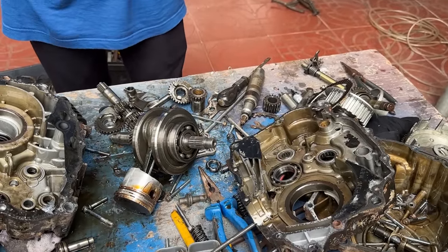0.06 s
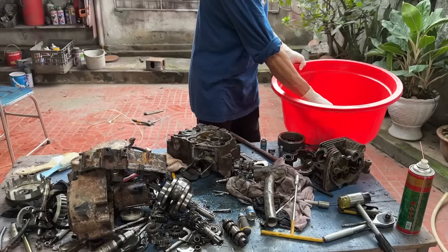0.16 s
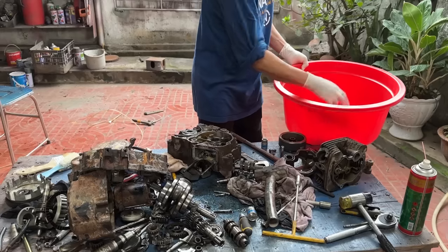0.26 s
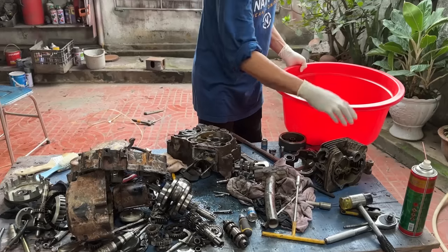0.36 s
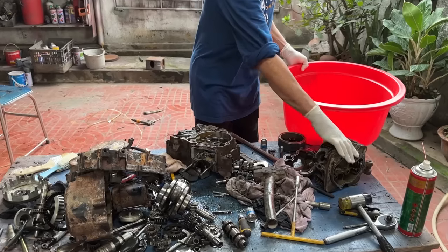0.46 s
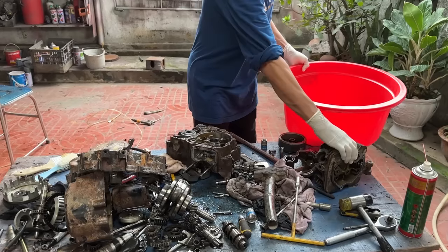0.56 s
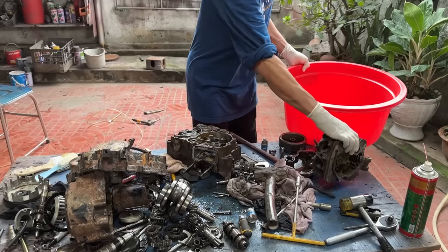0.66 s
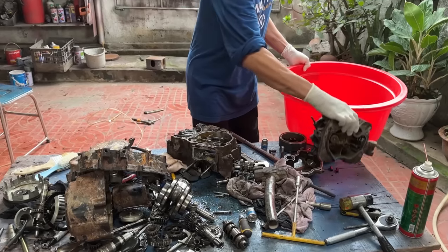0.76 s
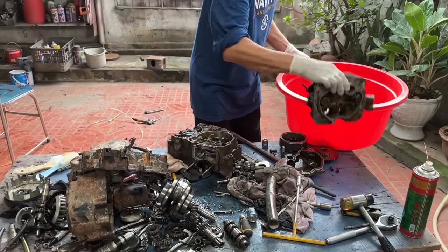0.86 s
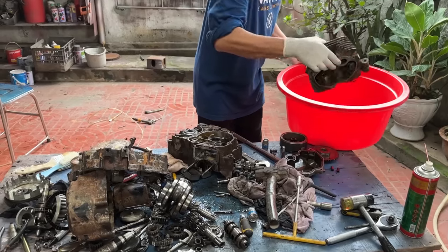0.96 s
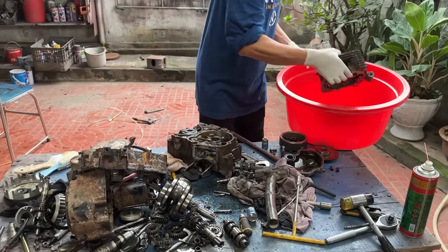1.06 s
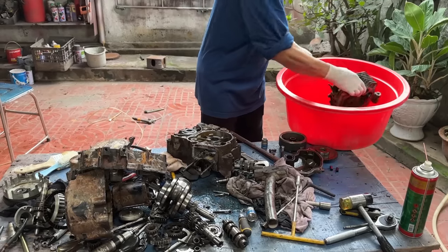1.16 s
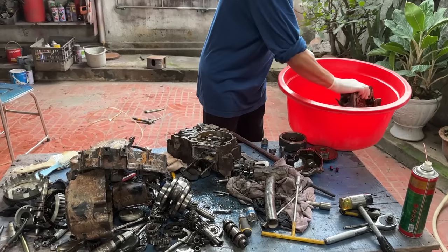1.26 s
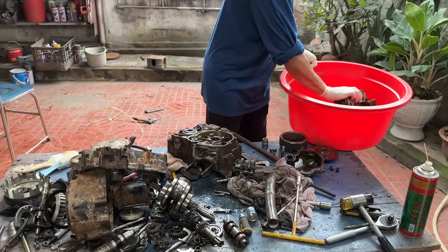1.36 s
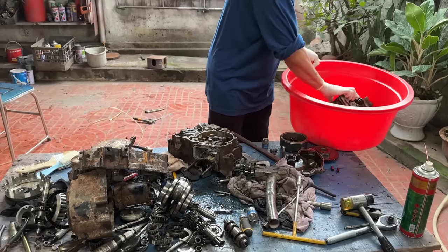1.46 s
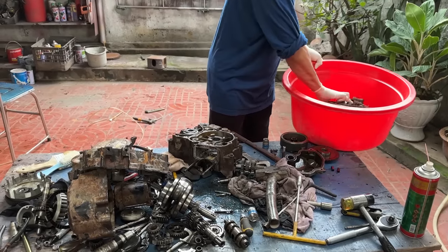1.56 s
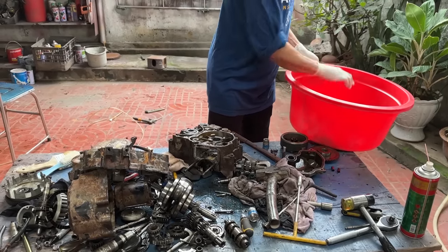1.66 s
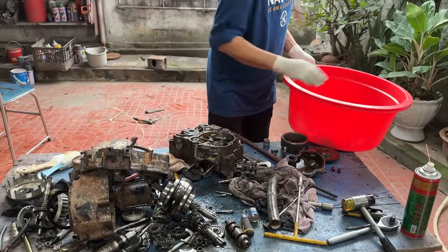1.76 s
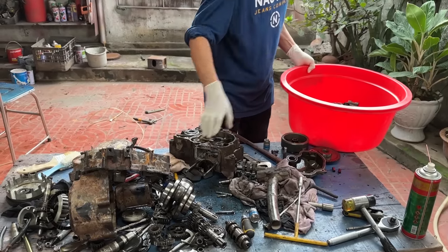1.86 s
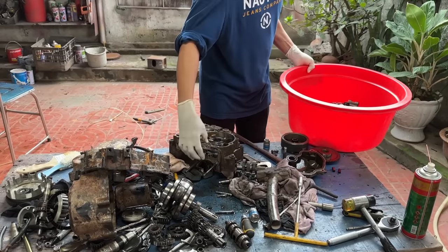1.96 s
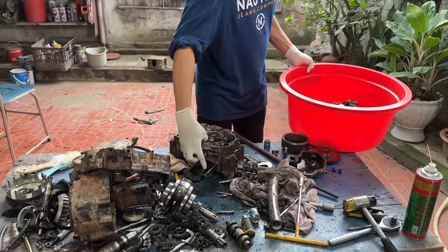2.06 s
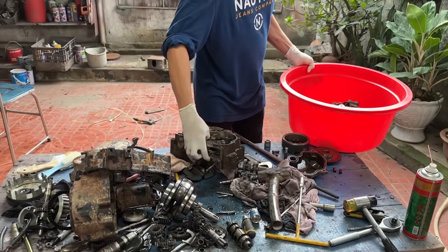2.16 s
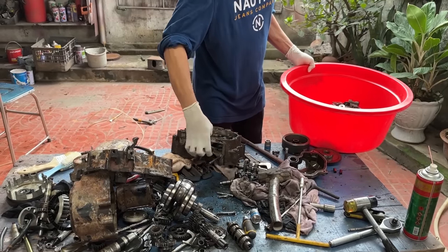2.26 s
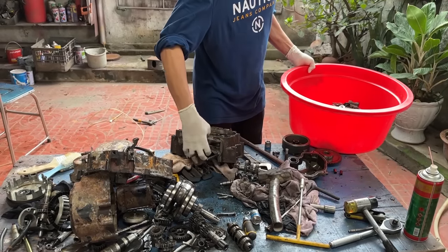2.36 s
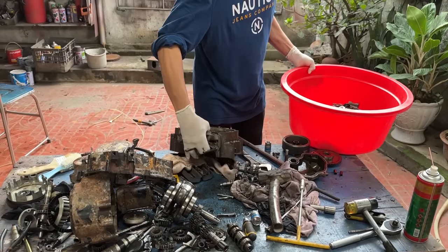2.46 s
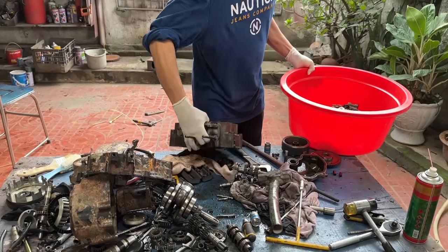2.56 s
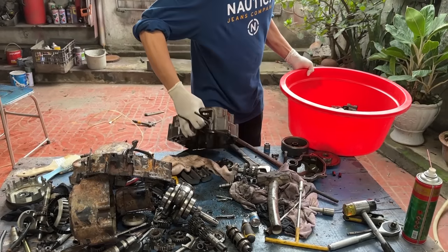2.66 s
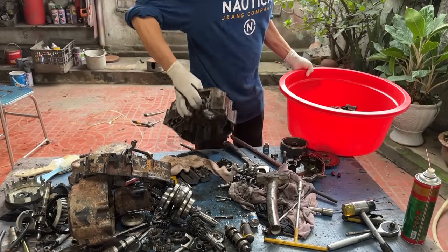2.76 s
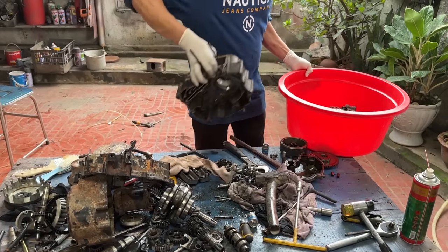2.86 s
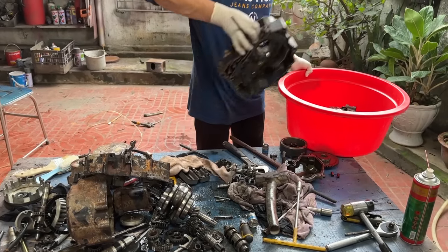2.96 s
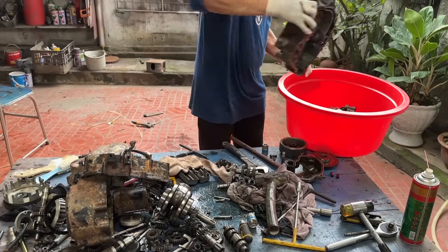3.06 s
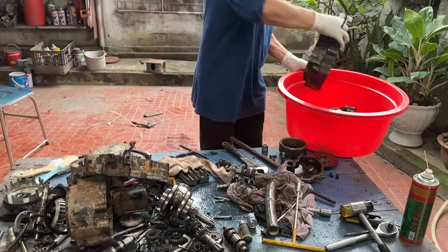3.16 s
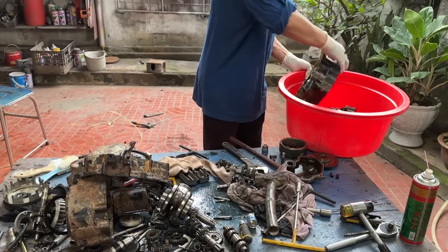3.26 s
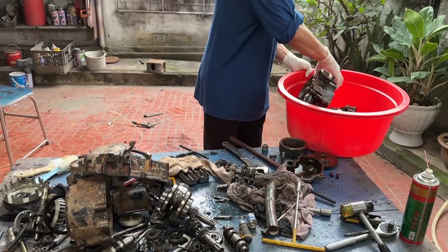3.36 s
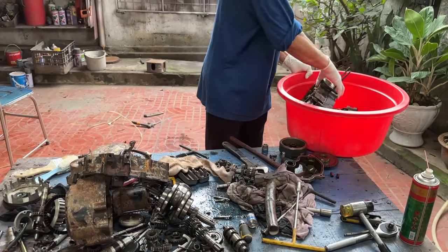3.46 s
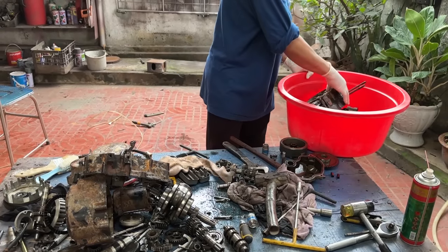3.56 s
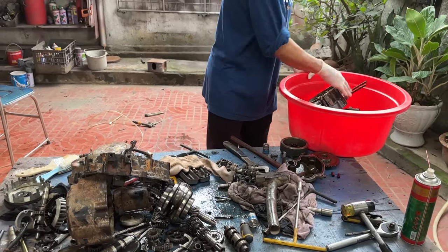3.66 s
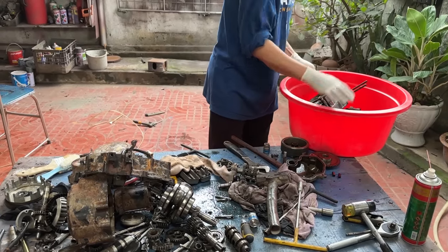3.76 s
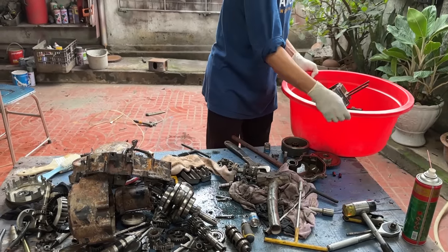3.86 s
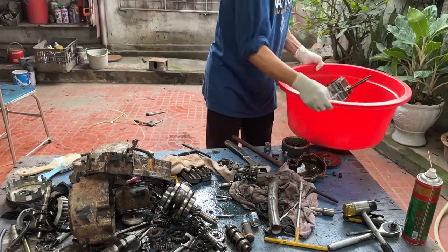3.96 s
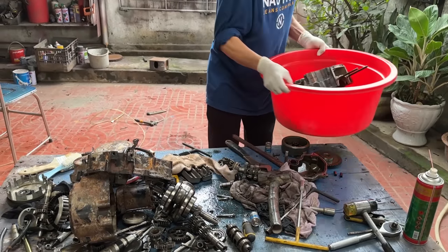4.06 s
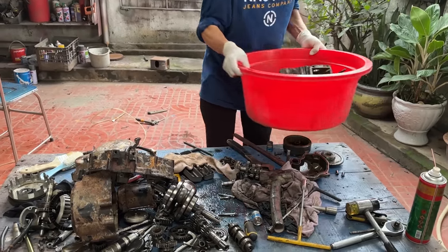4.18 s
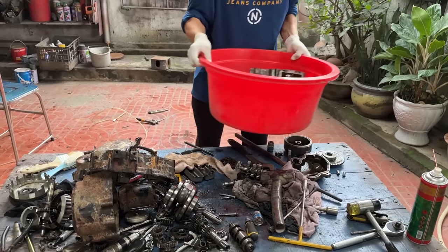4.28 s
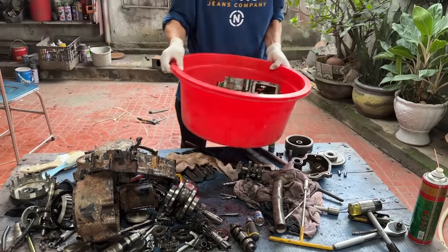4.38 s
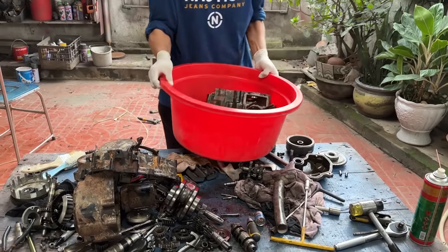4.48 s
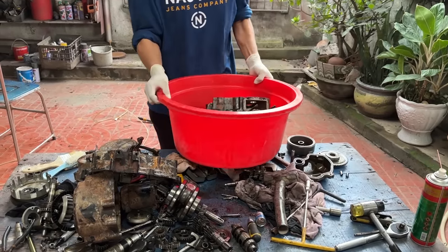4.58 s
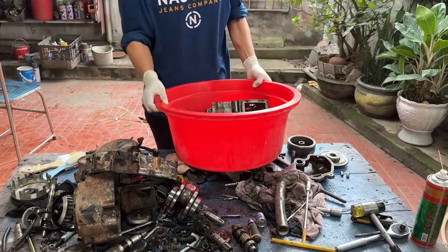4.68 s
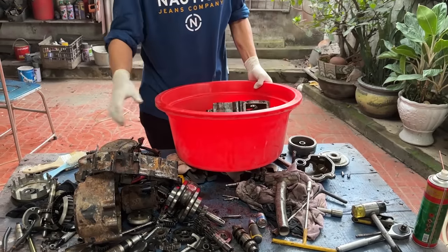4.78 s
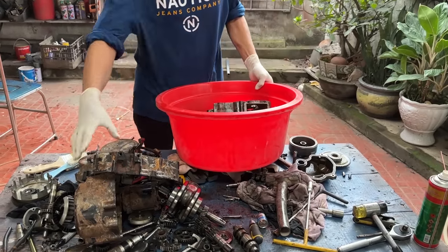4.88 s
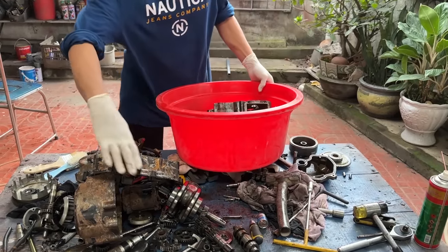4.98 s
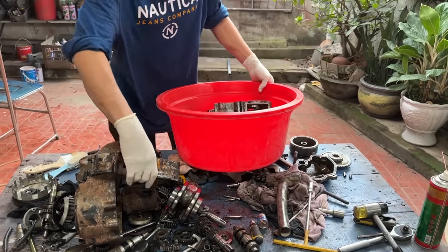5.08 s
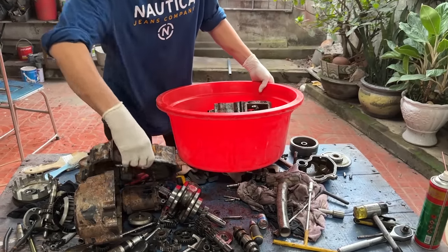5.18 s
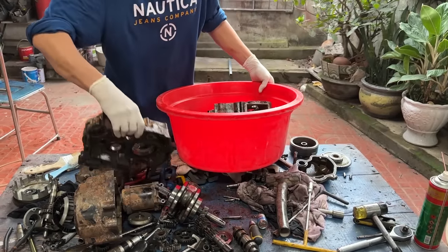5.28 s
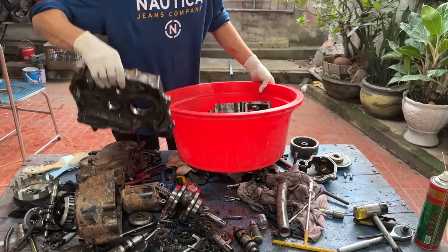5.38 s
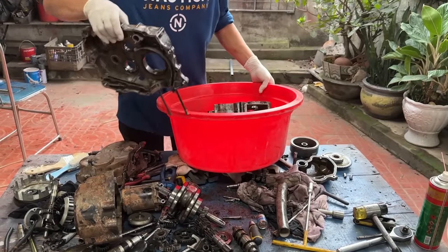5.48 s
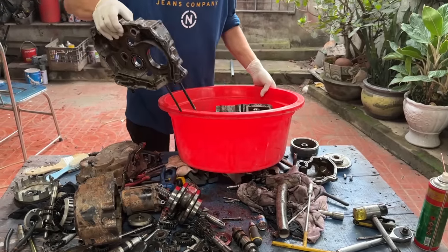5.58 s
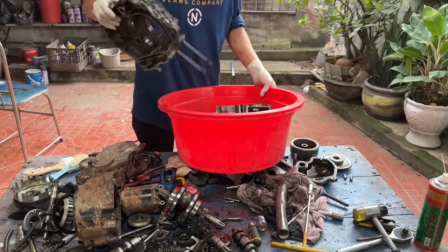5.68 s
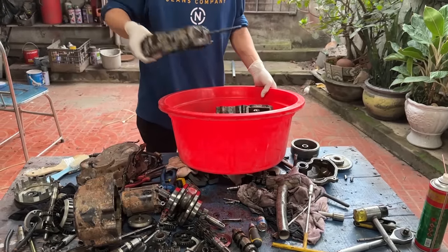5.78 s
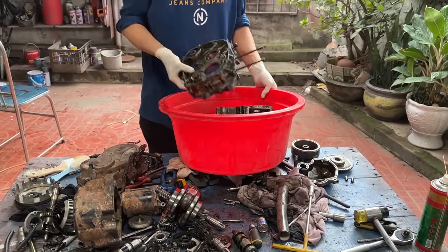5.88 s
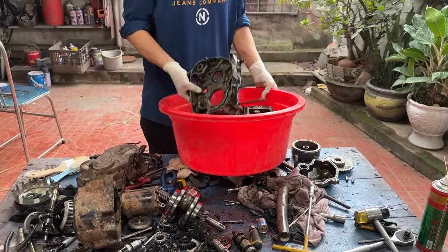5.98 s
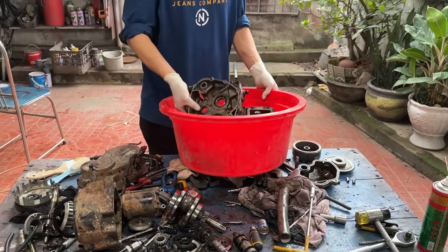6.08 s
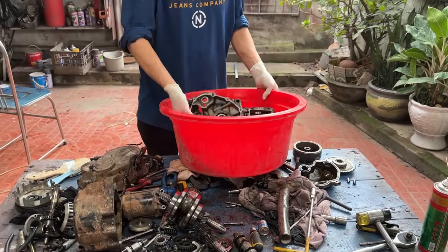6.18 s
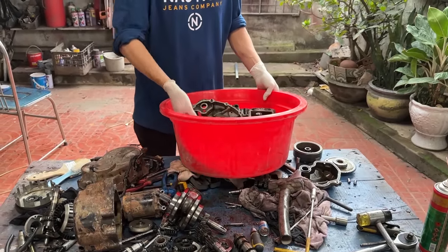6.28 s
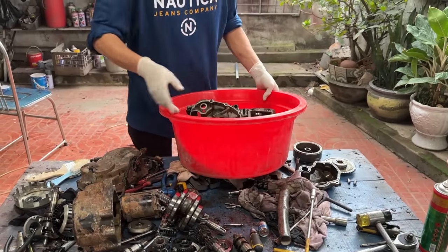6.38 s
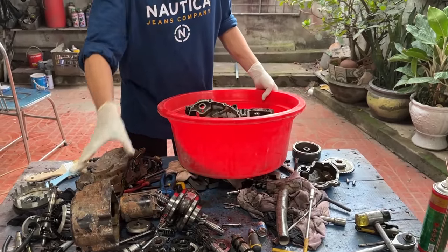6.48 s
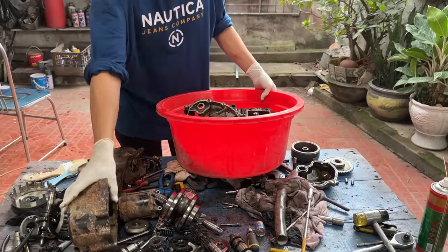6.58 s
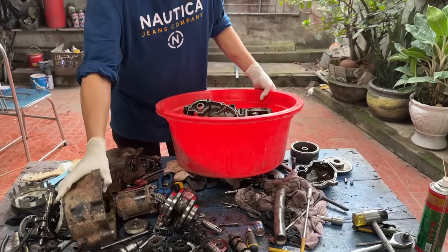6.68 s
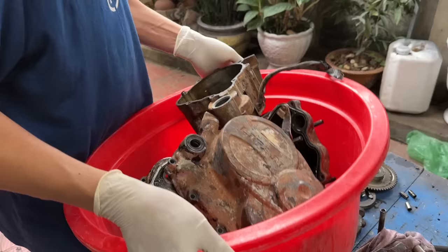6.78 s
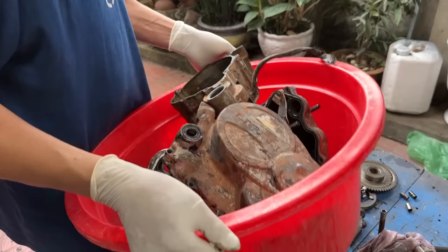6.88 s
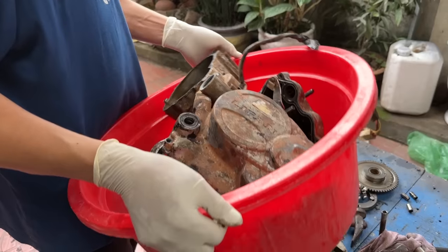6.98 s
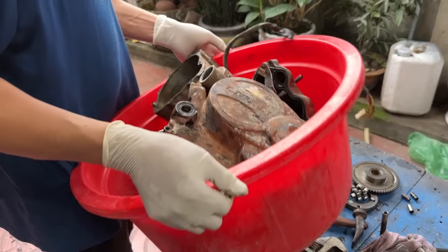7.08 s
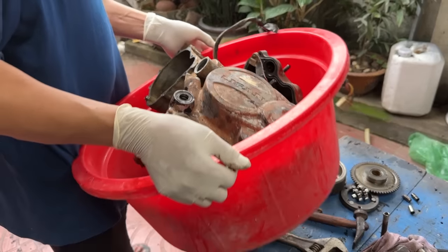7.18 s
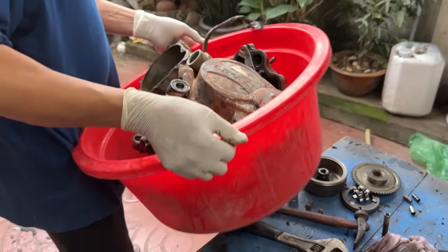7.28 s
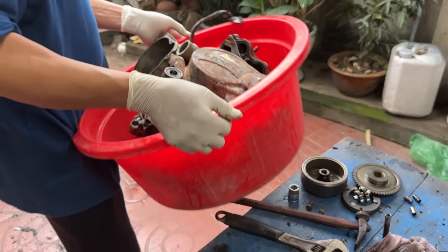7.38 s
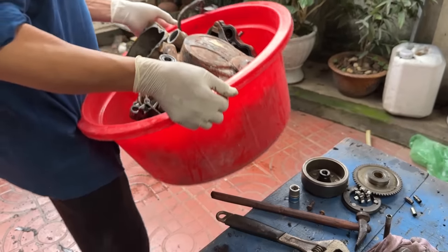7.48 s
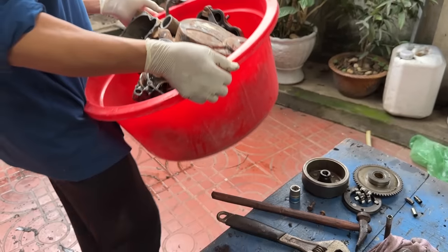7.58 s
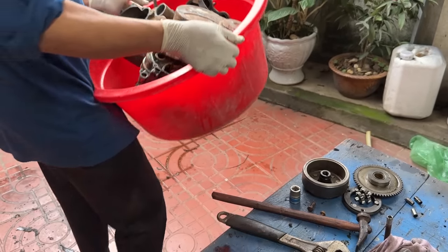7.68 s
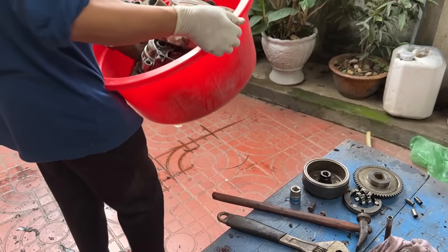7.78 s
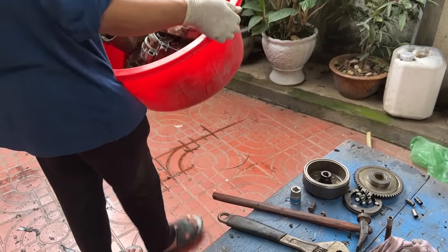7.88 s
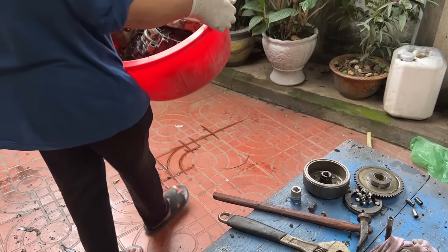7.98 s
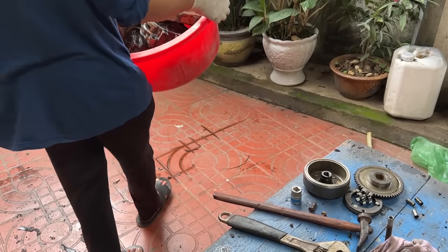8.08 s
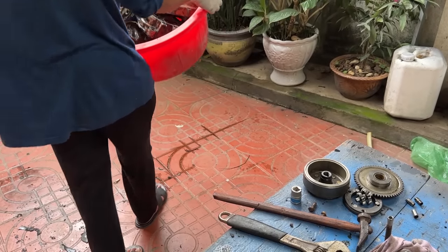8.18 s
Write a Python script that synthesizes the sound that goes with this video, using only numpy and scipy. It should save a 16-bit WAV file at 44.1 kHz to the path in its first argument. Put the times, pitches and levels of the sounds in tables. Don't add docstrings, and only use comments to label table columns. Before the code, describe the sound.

Cast metal engine parts knock, clank and scrape as they are lifted off a cluttered bench and dropped into a plastic tub in a walled yard.

```python
import sys
import numpy as np
from scipy import signal
from scipy.fft import rfft, irfft, next_fast_len
from scipy.io import wavfile
from scipy.ndimage import uniform_filter1d

SR = 44100
rng = np.random.default_rng(int(sys.argv[2]) if len(sys.argv) > 2 else 0)


def wav_record(signal):
    frames = np.transpose(np.atleast_2d(signal))
    bounded = np.clip(frames, -1, 1)
    quanta = np.round(bounded * 32767).astype(np.int16)
    wavfile.write(sys.argv[1], SR, quanta)


def magnitude_from_level(level_db):
    exponent = np.asarray(level_db, float) / 20
    return 10 ** exponent


N = 363366


def evened(x):
    return x / np.sqrt(np.mean(x ** 2) + 1e-20)


def peaked(x):
    return x / (abs(x).max() + 1e-12)


def read(points, hz):
    point_hz, value = np.transpose(points)
    return np.interp(np.log(hz + 1), np.log(point_hz + 1), value)


def add(mix, start_s, sound, pan_db):
    part = mix[:, round(start_s * SR):][:, :sound.shape[-1]]
    part += magnitude_from_level(np.array([[pan_db], [-pan_db]]) / 2) * sound[..., :part.shape[1]]


def coloured(x, points):
    size = next_fast_len(x.shape[-1])
    gain = magnitude_from_level(read(points, np.fft.rfftfreq(size, 1 / SR)))
    return irfft(rfft(x, size) * gain, size)[..., :x.shape[-1]]


def softened(x, rise_s):
    rise = np.minimum(np.arange(x.shape[-1]) / (rise_s * SR), 1)
    return x * np.sin(np.pi / 2 * rise) ** 2


def clatter(t60_s, share, size):
    t = np.arange(size) / SR
    strength = magnitude_from_level(2.47 * np.minimum(rng.exponential(1, size), 3)) * rng.standard_normal(size)
    hits = strength * (rng.random(size) < 3000 / SR)
    hits = share * hits * magnitude_from_level(-60 * t / np.clip(t60_s, .01, .4))
    hits[0] = 1
    return hits[None]


def last_before(rows, start_s):
    return max((row for row in rows if row[0] < start_s), key=lambda row: row[0])


# [pitch_hz, side_over_mid_db]
WIDTH = [(60, -27.5), (180, -23.5), (550, -15.5), (1650, -6), (4970, 0.4), (15000, -1)]


def ring(hz, level_db, t60_s, size):
    pole = 2j * np.pi * hz - np.log(1000) / np.maximum(t60_s, .004)
    modes = np.cumprod(np.repeat(np.exp(pole / SR)[:, None], size, 1), 1)
    lean = 1j * magnitude_from_level(read(WIDTH, hz)) * rng.choice([-1., 1.], len(hz))
    return (magnitude_from_level(level_db) * np.array([1 + lean, 1 - lean]) @ modes).imag


def echo(x, decays, size):
    taps = np.zeros((2, SR))
    at = np.arange(300, SR - 20, 20) + rng.integers(0, 20, (2, (SR - 301) // 20))
    np.put_along_axis(taps, at, rng.choice([-1., 1.], at.shape), 1)
    taps = np.array([taps[0] + 0.51 * taps[1], taps[0] - 0.47 * taps[1]])
    hz, t, z = signal.stft(taps, SR, nperseg=256)
    fade = magnitude_from_level(-60 * t / read(decays, hz)[:, None])
    tail = signal.istft(z * fade, SR, nperseg=256)[1]
    tail = tail[:, :size] / np.linalg.norm(tail[0])
    return signal.oaconvolve(x, tail, axes=1)[:, :x.shape[1]]


# [pitch_hz, likeness]
SAME = [(60, 0.97), (180, 0.97), (550, 0.53), (1650, 0.05), (4970, 0.16), (15000, 0.03)]


def air(points, patchy_db, size):
    frames, hz = size // 256 + 5, np.fft.rfftfreq(1024, 1 / SR)
    a, b, c, d, patches = rng.standard_normal((frames, 513, 5)).T
    patches = uniform_filter1d(patches, size=14, axis=0)
    patches = evened(uniform_filter1d(patches, size=12, axis=1))
    same = np.clip(read(SAME, hz), -1, 1)[:, None]
    left, other = a + 1j * b, c + 1j * d
    z = np.array([left, same * left + np.sqrt(1 - same ** 2) * other])
    z *= magnitude_from_level(read(points, hz)[:, None] + patchy_db * patches)
    return evened(signal.istft(z, nperseg=1024, noverlap=768)[1][:, :size])


def hum(hz, width_hz, level_db):
    r = np.exp(-np.pi * width_hz / SR)
    noise = rng.standard_normal(N) + 1j * rng.standard_normal(N)
    slow = signal.lfilter([1], np.convolve([1, -r], [1, -r]), noise)
    carrier = np.exp(2j * np.pi * hz * np.arange(N) / SR)
    return magnitude_from_level(level_db) * evened((slow * carrier).real)


# [end_s, start_s]
GAPS = [
    (.133, 0.1584),
    (6.817, 6.83),
]
# [pitch_hz, level_db_per_hz]
STREET = [(15, -61), (30, -35), (76, -1), (131, -17.5), (202, -13.5), (245, -23.5), (321, -20), (878, -28),
          (1430, -33), (4130, -41), (6920, -43), (10700, -61.5), (16500, -72)]
# [start_s, engine_db, street_air_db]
TRAFFIC = [
    (6.83, -45, -50.5),
    (7.002, -40.5, -51.5),
    (7.6, -46, -57.5),
    (8.04, -56, -65),
    (8.068, -51, -60.5),
    (8.24, -49, -56),
]
# [pitch_hz, level_db_per_hz]
YARD = [(15, -73), (30, -53), (138, -7), (177, -13.5), (726, -28), (927, -30), (1060, -30), (1880, -37),
        (4130, -36), (7300, -44.5), (8600, -40.5), (14400, -45.5), (16500, -64)]
# [pitch_hz, width_hz, level_db]
HUMS = [
    (135.6, 15, -63),
    (79.5, 10, -65.5),
]
YARD_DB, OPENING_DB = -57, -44.5


def background():
    t = np.arange(N) / SR
    middle = (t > GAPS[0][0]) & (t < GAPS[1][1])
    start_s, engine_db, street_db = np.transpose(TRAFFIC)
    yard = magnitude_from_level(YARD_DB) * air(YARD, 1.5, size=N) + sum(hum(*row) for row in HUMS)
    street = magnitude_from_level(np.interp(t, start_s, engine_db, left=-60)) * hum(84, 13.7, 0) * np.ones((2, 1))
    street_gain = magnitude_from_level(np.interp(t, start_s, street_db + 12, left=OPENING_DB))
    street[:, ~middle] += street_gain[~middle] * air(STREET, 2.26, size=N - middle.sum())
    return np.where(middle, yard, street)


# [start_s, clank_db, tick_over_clank_db, pitch_hz]
IN_TUB = [(0.002, -26.5, -28, 675), (0.057, -24, -39, 790), (0.169, -28, -21, 850),
          (0.213, -27.5, -19, 649), (0.233, -16.5, -23.5, 600), (1.285, -32, -23, 1440),
          (1.325, -24.5, -19, 600), (1.569, -18.5, -20, 885), (1.847, -28, -15, 1000),
          (3.359, -38, -9.5, 1130), (3.429, -31, -11, 2080), (3.472, -20.5, -18.5, 600),
          (3.585, -22.5, -10, 1910), (3.96, -34, -20, 940), (4.005, -30.5, -27, 600),
          (4.021, -17, -33, 937), (4.072, -34, -30, 1500), (4.117, -18.5, -14.5, 1200),
          (6.225, -16, -19.5, 604), (6.263, -13.5, -4.5, 1480), (6.309, -14.5, -15, 940),
          (6.396, -31.5, -7, 1480), (6.42, -25.5, -11.5, 603), (7.027, -12.5, -31, 1000)]
# [start_s, clank_db, tick_over_clank_db, pitch_hz]
ON_BENCH = [(0.73, -44, -14, 1290), (2.178, -29, -36, 1000), (2.2, -14, -29, 1110),
            (2.214, -19.5, -3.5, 830), (2.271, -14.5, -3, 1550), (2.3685, -21, -9, 1500),
            (2.768, -22.5, -33, 600), (2.774, -12.5, -23, 2300), (2.799, -17.5, -28, 695),
            (4.528, -22.5, -26, 675), (4.538, -30.5, -5, 1800), (4.655, -33.5, -10.5, 2500),
            (4.699, -28, -1.5, 1200), (4.675, -12, -14, 1185), (4.909, -36, -8, 2380),
            (4.954, -39, -14, 740), (5.175, -24.5, -7.5, 740), (5.301, -19.5, -6, 2430),
            (5.482, -15, -4, 904), (5.488, -7, -7, 696), (5.529, -10, -10.5, 2030),
            (5.62, -19.5, -32, 1700), (5.669, -15, -31, 988), (5.68, -10.5, -23.5, 930),
            (6.594, -32, -28, 1010), (6.658, -32.5, -14.5, 1480), (6.76, -34.5, -12.5, 904)]
# [start_s, clank_db]
REBOUNDS = [(0.282, -29.5), (1.369, -29.5), (1.577, -18), (1.61, -20), (1.627, -26), (1.659, -30.5),
            (1.718, -33.5), (2.299, -27.5), (3.457, -36.5), (4.147, -17.5), (4.586, -28), (5.202, -24),
            (5.509, -16.5), (5.548, -20.5), (5.698, -20.5), (5.718, -25), (6.289, -17.5), (6.337, -19),
            (6.623, -41), (7.047, -13.5), (7.069, -22), (7.099, -25.5)]
REBOUND_TICK_DB, REBOUND_PITCH = -3, 1.054
TUB_TILT_DB, BENCH_TILT_DB = -0.4, 1.13
TILT_PER_TICK = .06


def blows():
    first = []
    for rows, tilt_db in ((IN_TUB, TUB_TILT_DB), (ON_BENCH, BENCH_TILT_DB)):
        for row in map(tuple, rows):
            first.append(row + (tilt_db + TILT_PER_TICK * row[2],))
    again = []
    for start_s, clank_db in REBOUNDS:
        _, _, tick_db, hz, tilt_db = last_before(first, start_s)
        softer_tilt_db = tilt_db + TILT_PER_TICK * REBOUND_TICK_DB
        again.append((start_s, clank_db, tick_db + REBOUND_TICK_DB, hz * REBOUND_PITCH, softer_tilt_db))
    return sorted(first + again)


# [pitch_hz, level_db]
CASTING = [(350, -42), (600, -11.5), (729, -4), (1310, -3.5), (1510, -3.5), (1770, -5), (3270, -14),
           (5000, -21), (6500, -43.5), (11000, -120)]
# [pitch_hz, level_db]
TICK = [(1470, -34), (2500, 2), (5870, -5), (9050, -10.5), (13100, -19.5), (14700, -17), (16500, -25)]
CLATTER_S = 0.093
KNOCK_CLATTER, TICK_CLATTER = .18, .2


def knocks():
    out, t = np.zeros((2, N)), np.arange(600) / SR
    rows = blows()
    for (start_s, clank_db, tick_db, spot_hz, tilt_db), u in zip(rows, rng.random((len(rows), 169))):
        knock = clatter(CLATTER_S, KNOCK_CLATTER, size=6000)
        grit = clatter(CLATTER_S, TICK_CLATTER, size=6000)

        hz = np.geomspace(560, 5600, 56) * (.97 + .06 * u[:56])
        near_db = 6 * np.exp(-(np.log2(hz / spot_hz) / 0.38) ** 2)
        mode_db = read(CASTING, hz) + near_db + tilt_db * np.log2(hz / 1200) + 6 * u[56:112]
        t60_s = .017 * (.5 + u[112:168]) * (hz / 1500) ** -.3
        clank = softened(ring(hz, mode_db, t60_s, size=1600), .0026)

        tick = rng.standard_normal((2, 600))
        tick = coloured(tick + .5 * tick[::-1], TICK) * magnitude_from_level(-60 * t / 0.016)
        tick = softened(tick, .0022)

        pan_db = 2 * u[168] - 1
        clank = peaked(signal.fftconvolve(knock, clank, axes=1))
        tick = peaked(signal.fftconvolve(grit, tick, axes=1))
        add(out, start_s, magnitude_from_level(clank_db + 2.5) * clank, pan_db)
        add(out, start_s, magnitude_from_level(clank_db + tick_db + 6) * tick, pan_db)
    return out


# [pitch_hz, level_db, t60_s]
TUB = [(112, -8, 0.073), (160.8, -4, 0.069), (197.8, -0.5, 0.083), (275.2, 0.7, 0.067),
       (335.9, -0.5, 0.073), (440.6, 1.5, 0.049), (518.7, 0.5, 0.045), (600, -6.5, .04), (700, -22.5, .05)]
# [start_s, level_db, pitch_hz]
THUDS = [(0.002, -22.5, 444), (0.06, -21, 162), (0.212, -23.5, 487), (0.233, -9.5, 430), (1.324, -21, 509),
         (1.576, -14.5, 430), (1.782, -31, 350), (2.199, -20.5, 327), (2.266, -21, 444), (2.77, -23.5, 290),
         (3.378, -40.5, 350), (3.474, -16.5, 238), (3.479, -18, 480), (3.587, -15.5, 520),
         (3.956, -28, 520), (4.083, -20.5, 403), (4.108, -18, 302), (4.117, -9.5, 339), (4.145, -13, 342),
         (4.158, -12.5, 210), (4.808, -34.5, 346), (4.857, -35.5, 400), (4.529, -20.5, 504),
         (4.569, -27.5, 530), (4.677, -14.5, 450), (5.198, -21, 563), (5.301, -23, 553), (5.484, -7.5, 386),
         (5.495, -12.5, 196), (5.671, -20, 616), (6.224, -17, 530), (6.265, -14.5, 473), (6.415, -30, 210),
         (7.026, -20, 600), (7.046, -8, 112.5), (7.099, -17, 112)]
# [start_s, level_db]
SETTLES = [(0.259, -16), (1.345, -22.5), (1.365, -23), (1.387, -28.5), (1.415, -35), (1.609, -18.5),
           (1.639, -19.5), (4.199, -24), (5.528, -11), (6.288, -18.5), (6.307, -14)]
SETTLE_PITCH = .75
SAG_CLATTER_S, THUD_CLATTER = .1, .16


def thuds():
    out, (tub_hz, tub_db, tub_t60_s) = np.zeros((2, N)), np.transpose(TUB)
    settles = [(s, db, SETTLE_PITCH * last_before(THUDS, s)[2]) for s, db in SETTLES]
    rows = sorted(list(map(tuple, THUDS)) + settles)
    for (start_s, level_db, spot_hz), u in zip(rows, rng.random((len(rows), 18))):
        hz = tub_hz * (0.9197 + .16 * u[:9])
        octaves = np.log2(hz / spot_hz)
        near_db = 12 * np.exp(-(octaves / .4) ** 2) - 4.9 * abs(octaves)
        wall = softened(ring(hz, tub_db + near_db + 6 * u[9:], tub_t60_s, size=5000), 0.0049)
        sag = clatter(SAG_CLATTER_S, THUD_CLATTER, size=6000)
        thud = peaked(signal.fftconvolve(sag, wall, axes=1))
        add(out, start_s, magnitude_from_level(level_db + 0.06) * thud, 0)
    return out


# [start_s, strongest_s, end_s, level_db, tub_share_db]
SCRAPE = [(0.15, 0.2, 0.44, -53, -3), (3.35, 4.1, 3.8, -51.5, 3), (3.83, 3.97, 4.02, -47, -5),
          (1.33, 1.34, 1.437, -42.5, -2), (1.578, 1.5, 1.693, -37.5, -6), (2.22, 2.25, 2.36, -39.5, -8.5),
          (2.78, 2.79, 2.87, -38, -7), (4.535, 4.595, 4.67, -41.5, -3.5), (6.84, 6.92, 7.02, -47, -2),
          (7.03, 7.06, 7.16, -34, -6), (4.02, 4.1, 4.3, -50, 4), (.69, 0.72, 0.785, -62.5, -4),
          (5.12, 5.17, 5.18, -54, 1), (4.52, 4.6, 5.0, -52.5, 7.5), (5.17, 5.24, 5.45, -53.5, 5),
          (5.87, 6.1, 6.2, -60, -0.5), (6.56, 6.77, 6.82, -52, 1), (8.03, 8.2, 8.24, -61, -2)]
# [pitch_hz, level_db_per_hz]
DRAG = [(300, -30), (550, -6), (1000, 0), (1600, -3), (2600, -10), (5000, -25), (15000, -40)]
SCRAPE_START_DB, SCRAPE_END_DB = -9.5, -12


def scrape():
    t = np.arange(N) / SR
    strength = magnitude_from_level(3.3 * np.minimum(rng.exponential(1, (2, N)), 5)) * (rng.random((2, N)) - .5)
    slips = strength * (rng.random((2, N)) < 1700 / SR)
    slips = slips + .6 * slips[::-1]
    body = np.exp(-t[:300] / .00006) * rng.standard_normal(300)
    metal = evened(coloured(signal.oaconvolve(slips, body[None])[:, :N], DRAG))
    wall = ring(*np.transpose(TUB), size=5000)
    plastic = evened(signal.oaconvolve(slips.mean(0)[None], wall, axes=1)[:, :N])
    out = np.zeros((2, N))
    for *times_s, level_db, share_db in SCRAPE:
        swell_db = np.interp(t, times_s, [SCRAPE_START_DB, 0, SCRAPE_END_DB], -150, -150)
        gain = uniform_filter1d(magnitude_from_level(level_db + swell_db), size=500)
        out += gain * (metal + magnitude_from_level(share_db) * plastic)
    return out


# [start_s, strongest_s, end_s, level_db]
RUSTLES = [(.16, .3, 0.61, -61.5), (.55, .74, .95, -65.5), (1.28, 1.5, 2.03, -62.5), (2.16, 2.3, 2.5, -60),
           (2.215, 2.28, 2.33, -45), (4.07, 4.1, 4.15, -57), (6.66, 6.67, 6.65, -56),
           (2.898, 3.05, 3.3, -70), (3.58, 3.6, 3.9, -54), (3.718, 3.87, 4.14, -59.5),
           (4.106, 4.16, 4.25, -49), (4.2, 4.24, 4.36, -64), (4.401, 4.5, 4.8, -62.5),
           (4.66, 4.72, 5.0, -59.5), (5.1, 5.25, 5.8, -62), (5.799, 5.92, 6.25, -62),
           (6.04, 6.12, 6.5, -62), (6.55, 6.67, 6.64, -61), (7.0, 7.03, 7.12, -63), (8.14, 8.19, 7.7, -64)]
# [pitch_hz, level_db_per_hz]
RUSTLE = [(800, -20), (2500, -3.5), (6000, -1), (10000, -0.5), (14000, -1), (15500, -12)]
RUSTLE_EDGE_DB = -8.5


def rustle():
    t = np.arange(N) / SR
    flicker = evened(uniform_filter1d(rng.standard_normal(N), size=900))
    hiss = evened(coloured(rng.standard_normal((2, N)), RUSTLE))
    swell = np.zeros(N)
    for *times_s, level_db in RUSTLES:
        swell += magnitude_from_level(level_db + np.interp(t, times_s, [RUSTLE_EDGE_DB, 0, RUSTLE_EDGE_DB], -150, -150))
    return uniform_filter1d(swell, size=400) * magnitude_from_level(1.8 * flicker) * hiss


# [start_s, level_db, pitch_hz, left_right_db]
SPECKS = [(0.3643, -34, 10000, 7), (0.4247, -42, 4250, -2), (0.4472, -45, 8840, 10.5),
          (0.614, -44, 13000, 17), (1.1064, -43, 14000, 9.0), (1.5194, -41, 9580, 14.5),
          (2.1021, -48, 14100, 3), (2.255, -38, 4440, 2), (3.234, -48, 2770, -0.5),
          (3.5458, -44, 9800, -4.5), (3.8771, -38.5, 14100, 8), (6.6568, -28, 9400, 14.5),
          (6.759, -44, 2520, 6), (2.2145, -32, 13500, 6), (2.272, -22, 14500, 3), (4.007, -46, 11970, 3),
          (4.035, -46, 12500, 3), (6.657, -36, 15000, 6), (6.76, -43.5, 9050, 4.5), (8.18, -54, 9000, 0)]
# [start_s, level_db, pitch_hz, left_right_db]
MORE_SPECKS = [(0.4673, -47, 4640, 3.0), (0.6594, -56, 13200, 6.5), (0.8594, -57, 3050, 4.5),
               (1.072, -62, 4010, 6), (1.1922, -54, 9820, 8.0), (1.2094, -59, 3520, 7.5), (1.4337, -52, 5500, 3.5),
               (1.5035, -45, 7620, 3), (2.1276, -50.5, 9910, 5.0), (2.164, -47, 2690, 0.5),
               (2.5616, -50, 11700, 8), (3.0684, -55, 10100, 5.0), (3.8944, -42, 2500, 1.5),
               (4.5391, -32.5, 2570, 0.0), (5.8282, -47, 2520, 3.0), (5.883, -45, 2960, 2.0),
               (6.0886, -49, 5750, 7), (6.571, -49, 11100, 4.5)]


def specks():
    out = np.zeros((2, N))
    for start_s, level_db, pitch_hz, pan_db in list(SPECKS) + list(MORE_SPECKS):
        hz = pitch_hz * np.geomspace(.7, 1.15, 6) * rng.uniform(0.96, 1.05, 6)
        cluster = ring(hz, -14 * rng.random(6), np.full(6, 0.013), size=1500)
        add(out, start_s, magnitude_from_level(level_db) * peaked(softened(cluster, .0003)), pan_db)
    return out


# [start_s, length_s, pitch_hz, level_db]
CHIRPS = [
    (.53, 0.12, 6200, -65),
    (1.43, .08, 5600, -68),
    (2, 0.094, 6800, -63),
    (6.08, 0.12, 5800, -63),
    (7.46, 0.045, 4000, -62),
    (.67, .13, 12000, -70),
    (7.96, 0.14, 3200, -67),
    (2.3, 0.063, 1620, -59),
    (7.45, .14, 2950, -68),
]


def birds():
    out = np.zeros((2, N))
    for start_s, length_s, hz, level_db in CHIRPS:
        t = np.arange(0, length_s, 1 / SR)
        fuzz = evened(uniform_filter1d(rng.standard_normal(len(t)), size=90))
        whistle = fuzz * np.sin(2 * np.pi * hz * t) * np.sqrt(np.hanning(len(t)))
        add(out, start_s, magnitude_from_level(level_db) * whistle, 0)
    return out


# [pitch_hz, level_db, t60_s]
CRANKCASE = [(2633, 2.5, 0.07), (1900, -12.5, .08), (3078, -5.5, 0.094), (4170, -20.5, .09),
             (5350, -18, 0.15), (6650, -20.5, .1), (7020, -18.5, 0.051), (8330, -24, .08), (14310, -28, .1),
             (9910, -22, .1), (12590, -26, .1)]
COVER = [(2583, 0, 0.27), (2756, -18.5, 0.1), (1635, -18, 0.4), (3074, -20.5, 0.3), (5380, -36, .1)]
GEAR = [(9039, -4, 0.28), (14140, -21, .14), (14680, -24, .14), (15080, -19, .14), (12890, -25, .14),
        (10850, -23.5, .12), (9670, -26, .1), (6928, -26, .08)]
HUB = [(1480, -16, 0.11), (2295, -3, 0.22), (4320, -20.5, .06), (6800, -16, 0.11)]
CASE = [(1475, 1.5, .2), (2285, -5, 0.14), (2720, -13.5, 0.17), (3550, -6.5, 0.2), (4637, -16, 0.15),
        (5001, -15, .15), (5540, -20, 0.12), (8240, -16, 0.085)]
PIN = [(11000, 0, 0.089), (4110, 0, .07)]
# [start_s, level_db, left_right_db, free_s, part_modes]
RINGS = [(3.586, -16, 0.5, .09, CRANKCASE), (3.6, -33, -1, .17, [(2620, 0, .25), (2666, -1.5, .3)]),
         (4.676, -21, 1, .08, [(1170, -0.5, 0.11), (1500, -1, .08), (3100, -11, 0.043)]),
         (1.572, -25.5, 0, .09, [(880, -0.18, 0.14), (993, -1.5, 0.16)]), (4.116, -7, -1, 0.023, COVER),
         (4.154, -19, -1, .025, COVER), (4.18, -34, -1, .17, COVER), (4.145, -27, 8.5, .15, GEAR),
         (2.272, -36, 10, .09, GEAR), (2.369, -41.5, 6, .07, GEAR), (5.302, -28, -2, .2, HUB),
         (6.263, -19, 0, 0.048, CASE), (2.1, -50.5, 2, .1, PIN), (4.072, -33, -1, .044, COVER),
         (4.27, -46, 1, 0.15, [(747, 0, 0.82)]), (7.91, -62, 2, .02, [(4260, 0, .06), (6800, -1.5, .06),
         (8300, -3, .05)]), (7.938, -50.5, 4, .03, [(4250, 2, 0.068), (5400, -4, .05), (3330, -5, .05),
         (7000, -2, 0.053), (8300, -9, .04)])]
MUFFLED_T60_S = .05


def clinks():
    out, t = np.zeros((2, N)), np.arange(14000) / SR
    off = np.array([[0], [.007], [-.012], [.021], [-.028]])
    for start_s, level_db, pan_db, free_s, part in RINGS:
        hz, mode_db, t60_s = np.transpose(part)
        split_hz = (hz * (1 + off)).ravel()
        split_db = (mode_db - 128 * np.sqrt(abs(off))).ravel()
        split_t60_s = (t60_s * (1 - 15 * abs(off))).ravel()
        clink = softened(ring(split_hz, split_db, split_t60_s, size=14000), 0.0028)
        muffling_db = -60 * np.maximum(t - free_s, 0) / MUFFLED_T60_S
        add(out, start_s, magnitude_from_level(level_db + muffling_db) * clink, pan_db)
    return out


# [start_s, level_db, pitch_hz]
SQUEAL = [
    (6.83, -47.5, 6610),
    (6.858, -30, 6550),
    (6.874, -25.5, 6554),
    (6.89, -34.5, 6564),
    (6.915, -25.5, 6580),
    (6.944, -24, 6606),
    (6.964, -38, 6589),
    (6.983, -32, 6555),
    (7.01, -49, 6550),
]


def brake():
    start_s, level_db, hz = np.transpose(SQUEAL)
    t = np.arange(start_s[0], start_s[-1], 1 / SR)
    waver_hz = 14 * evened(uniform_filter1d(rng.standard_normal(len(t)), size=400))
    phase = 2 * np.pi * np.cumsum(np.interp(t, start_s, hz) + waver_hz) / SR
    lead = np.array([[1], [-1]])
    whistle = np.sin(phase + 0.63 * lead) + magnitude_from_level(-12.5) * np.sin(2 * phase + .55 * lead)
    tone = magnitude_from_level(np.interp(t, start_s, level_db) + 1.6) * whistle
    near, out = np.zeros((2, SR)), np.zeros((2, N))
    add(near, 0, tone * signal.windows.tukey(len(t), .1), 8)
    street = echo(near, [(6000, 0.77), (13000, 0.38)], size=SR)
    add(out, start_s[0], near + magnitude_from_level(-2.5) * street, 0)
    return out


# [pitch_hz, t60_s]
WALLS = [(150, 0.38), (600, 0.42), (2000, 0.42), (6000, 0.46), (14000, 0.35)]


def yard_echo(parts, rings):
    left, right = magnitude_from_level(-10.5) * echo(parts + magnitude_from_level(-5) * rings, WALLS, size=SR // 2)
    side = magnitude_from_level(4.0) * coloured(left - right, WIDTH)
    return (left + right + np.array([side, -side])) / 2


def scene():
    around = background()
    parts = knocks() + thuds() + scrape()
    parts = signal.sosfilt(signal.butter(6, 95, "high", fs=SR, output="sos"), parts)
    rings = specks() + clinks()
    return parts + rings + yard_echo(parts, rings) + brake() + birds() + rustle() + around


def low_pass(x):
    return signal.sosfilt(signal.butter(12, 16660, fs=SR, output="sos"), x)


def record(dry):
    t = np.arange(N) / SR
    for end_s, start_s in GAPS:
        dry = dry * np.clip(np.maximum((end_s - t) / 0.0037, (t - start_s) / 0.0054), 0, 1)
    dry = signal.oaconvolve(dry, signal.firwin(255, 16200, fs=SR)[None], "same")
    mix = np.tanh(dry / 1.226) * 1.174
    return low_pass(mix)


dry = scene()
out = record(dry)
wav_record(out)
```